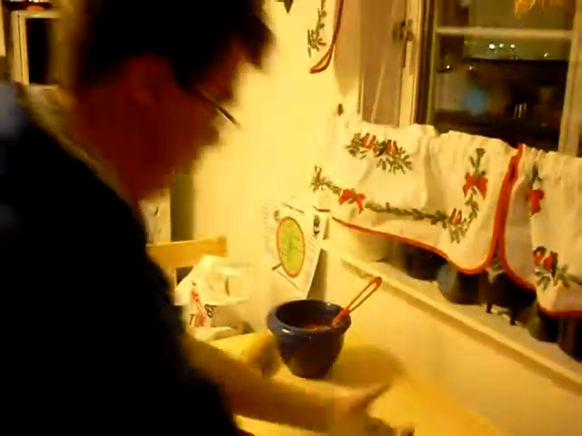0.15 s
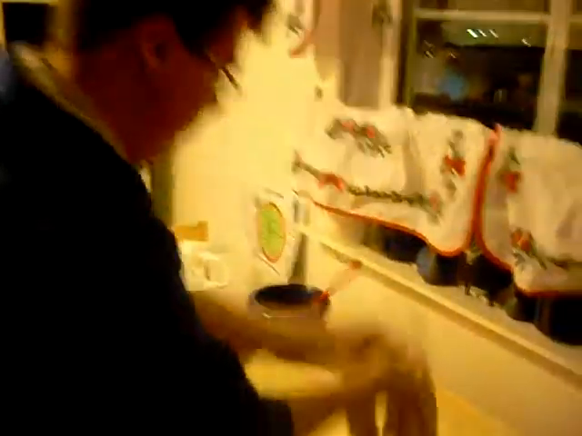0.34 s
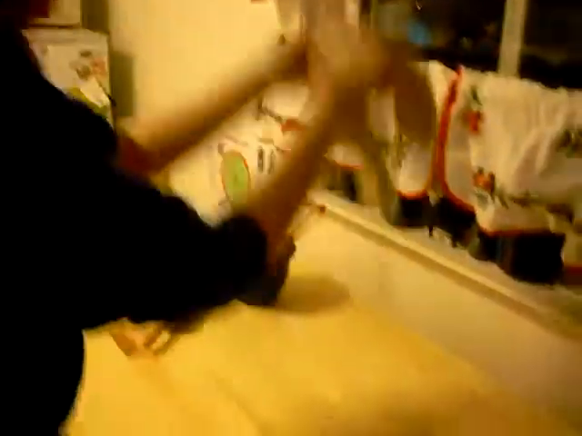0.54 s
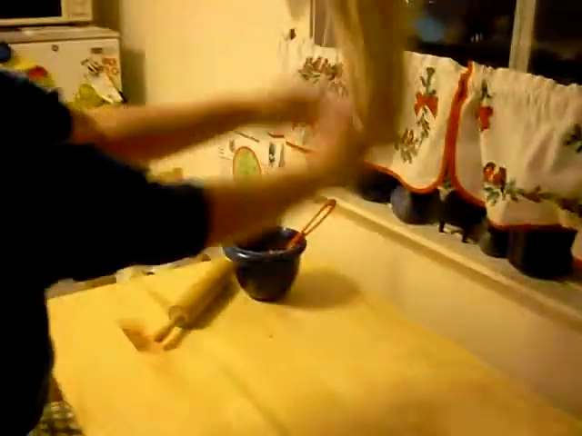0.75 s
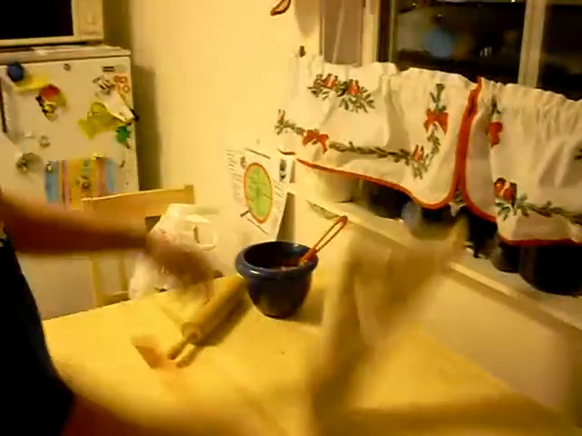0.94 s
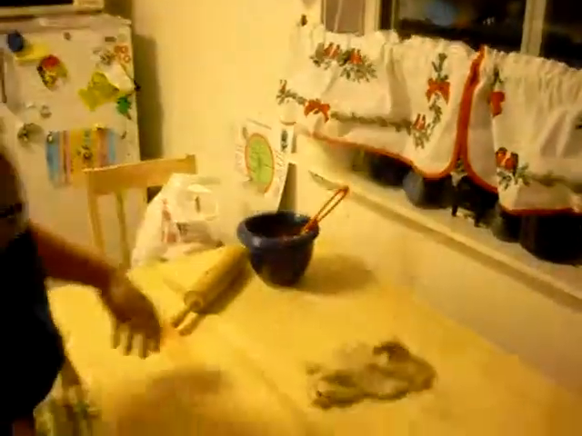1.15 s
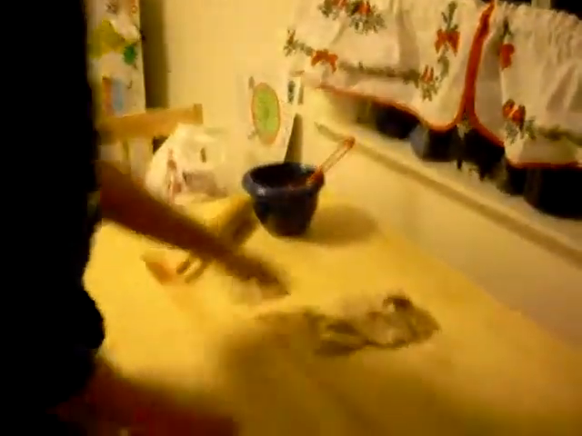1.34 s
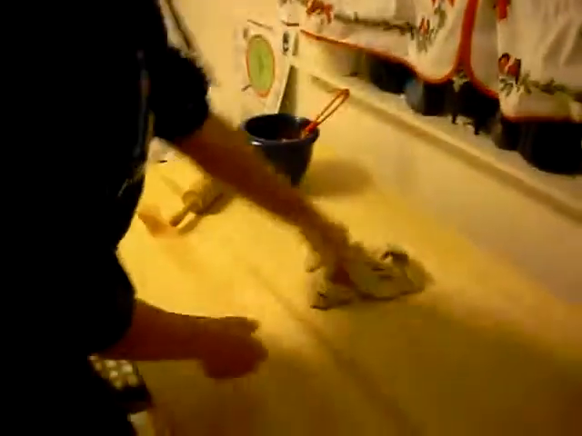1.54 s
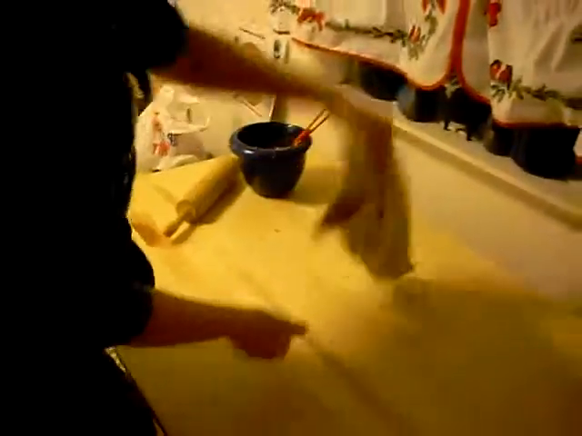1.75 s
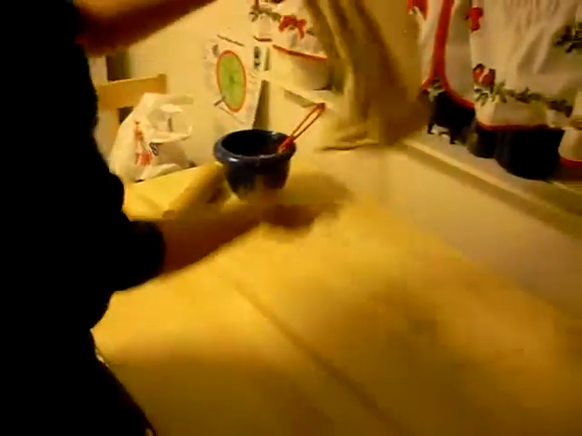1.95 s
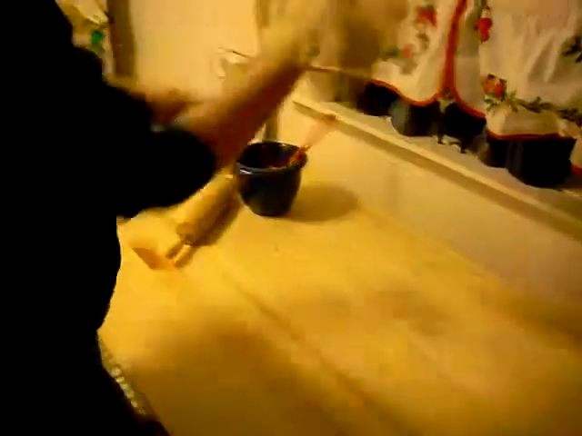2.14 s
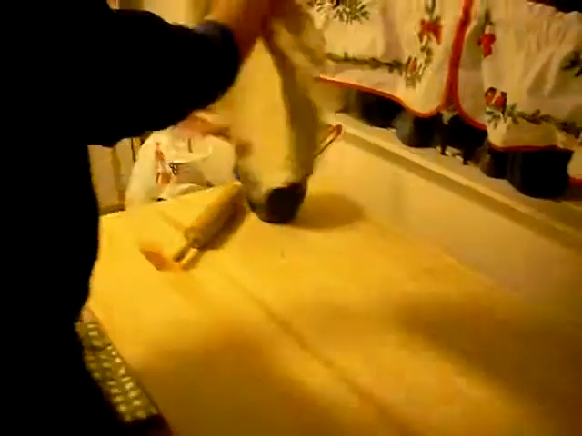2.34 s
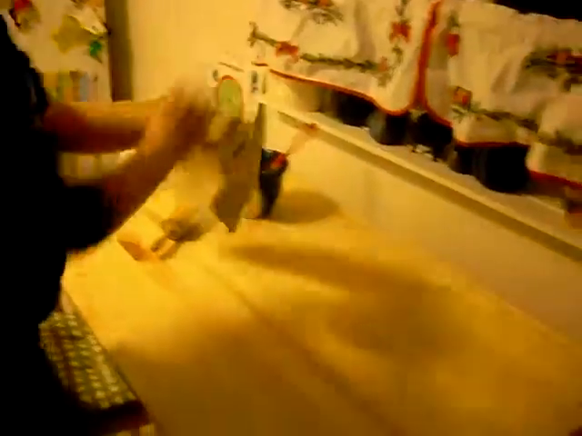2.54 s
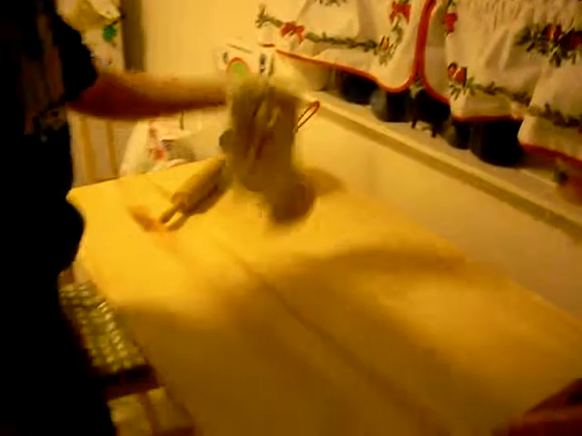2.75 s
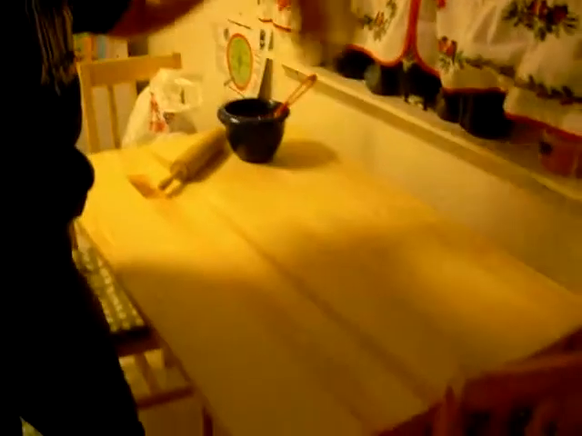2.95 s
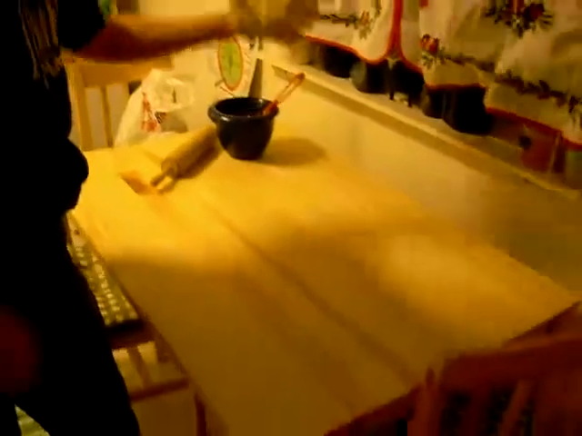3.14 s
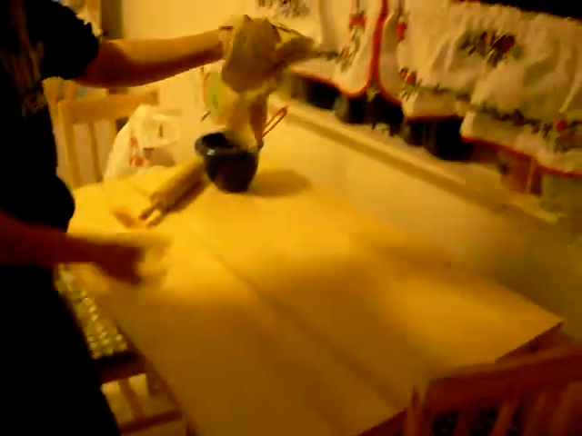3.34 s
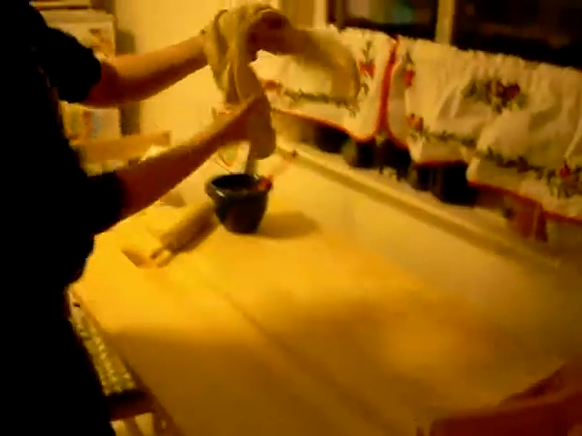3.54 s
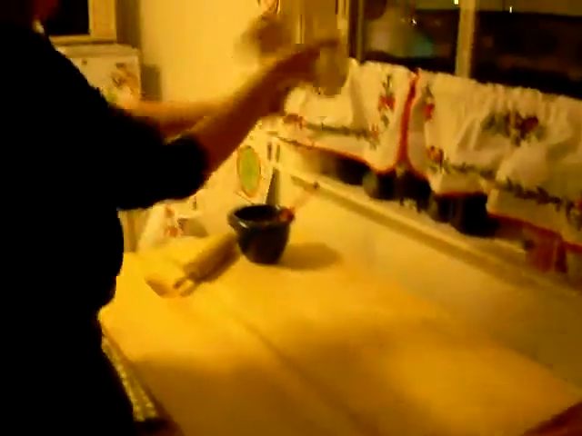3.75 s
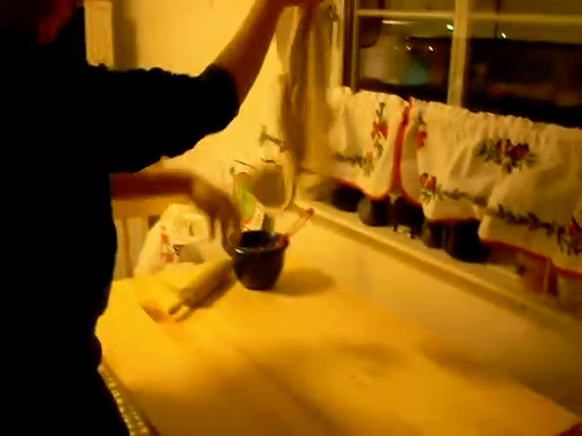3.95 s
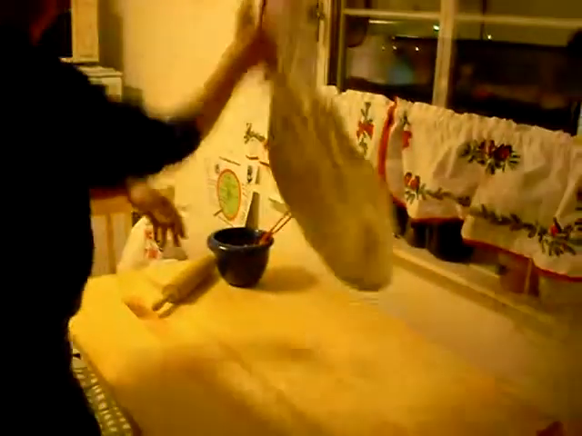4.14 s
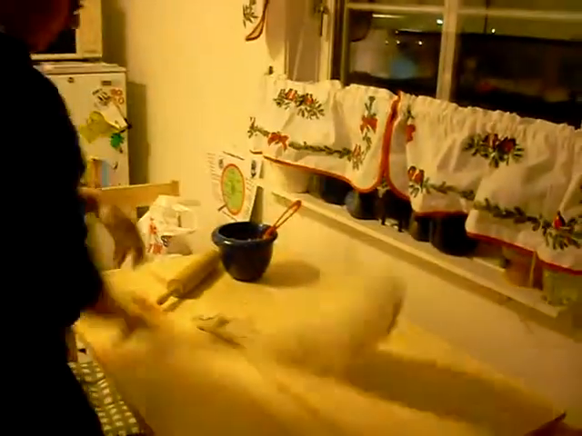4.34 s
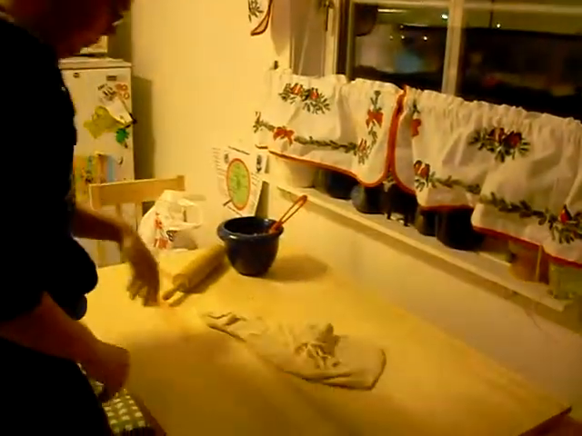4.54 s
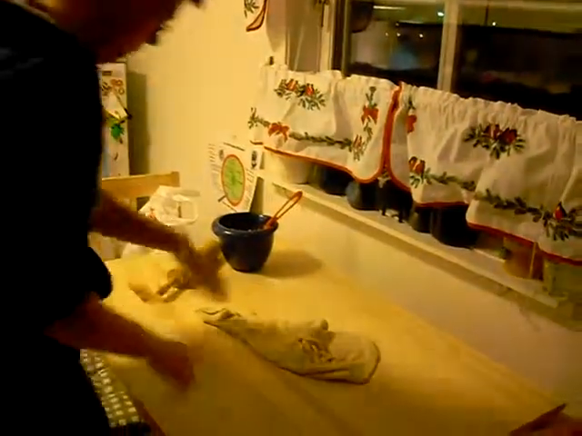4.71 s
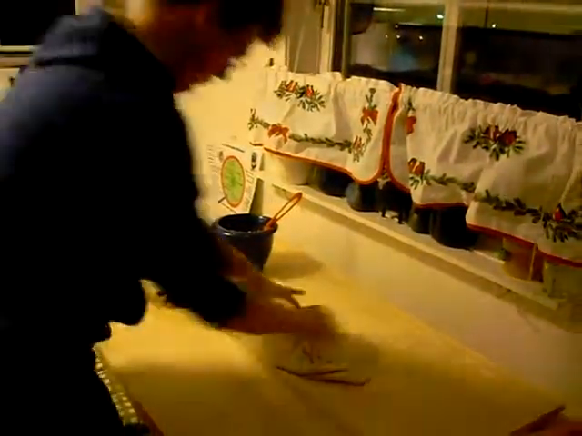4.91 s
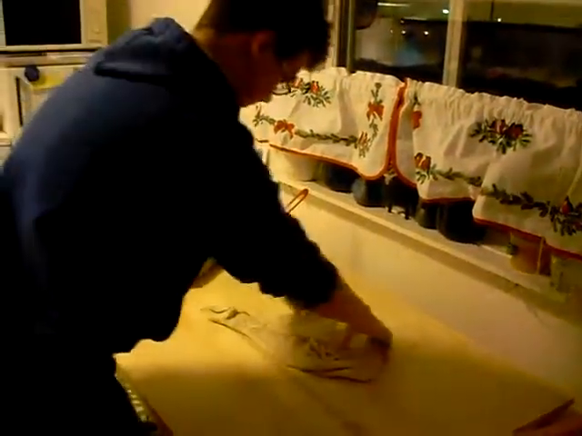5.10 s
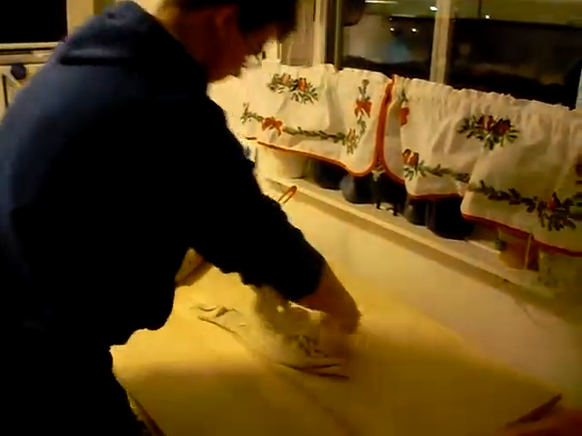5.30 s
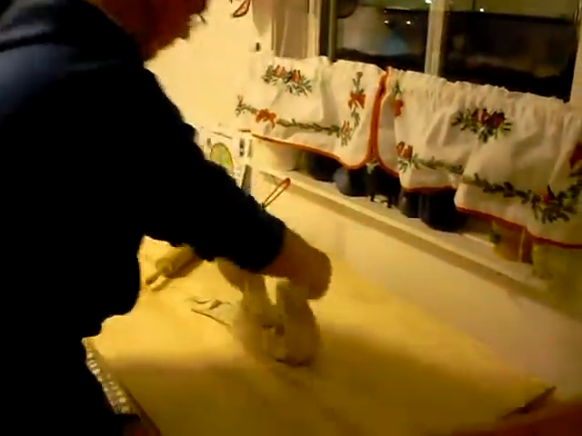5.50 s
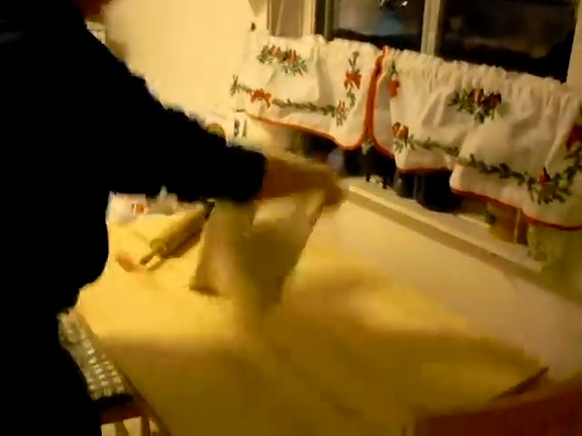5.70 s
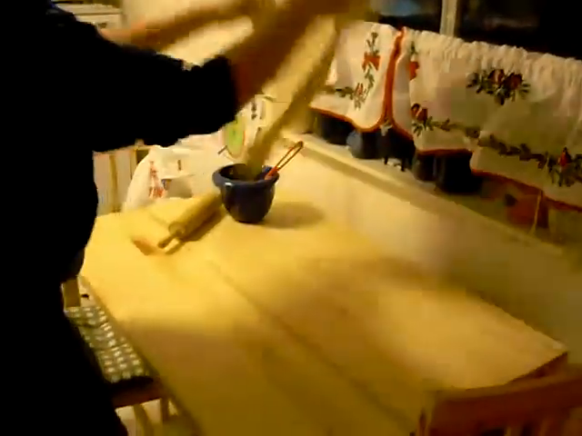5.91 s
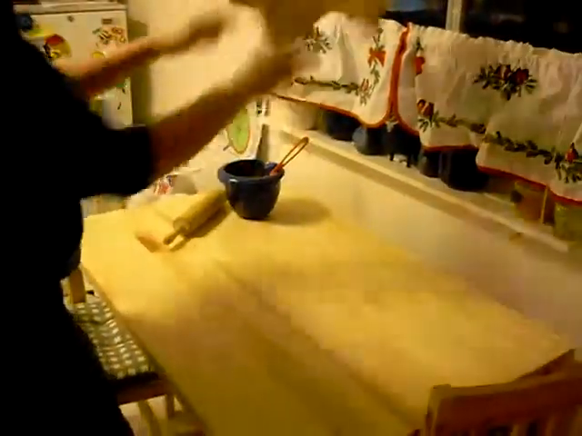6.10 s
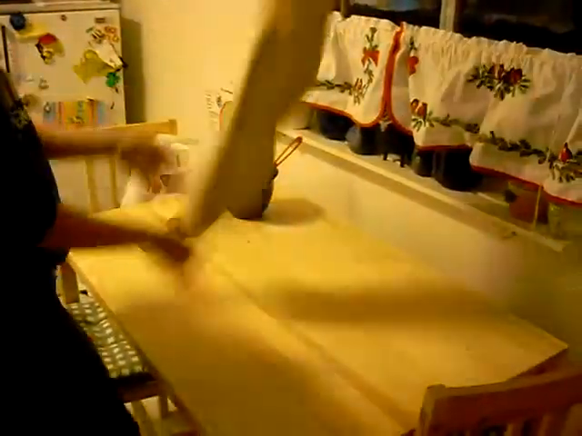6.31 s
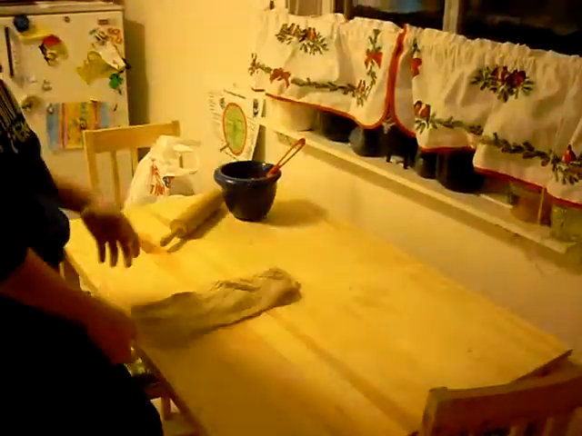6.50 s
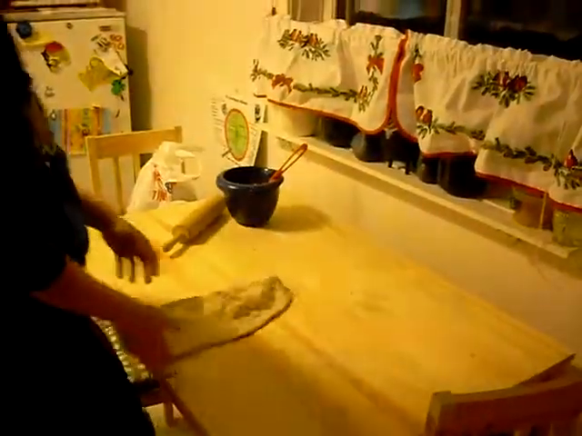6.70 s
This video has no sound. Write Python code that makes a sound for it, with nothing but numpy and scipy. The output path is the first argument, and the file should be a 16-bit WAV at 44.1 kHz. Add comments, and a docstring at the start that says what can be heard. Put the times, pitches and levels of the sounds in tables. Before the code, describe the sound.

Dough is thrown repeatedly onto a wooden tabletop, each blow a smack with a short woody thud and a brief kitchen echo. Light slaps and a solid one open, followed by a quieter stretch of sleeve rustle, soft pats and a dull swish. Then the loudest slap hits, a gentle pat follows, and a loose, flapping landing closes. The nearby microphone adds a low hiss and a faint intermittent buzz.

```python
"""A small kitchen: a sheet of dough is swung and slapped onto a wooden table, with softer pats between.
Each blow thuds in the boards and smacks as the dough spreads; trapped air pops out, the room rings briefly.
Sleeves rustle, floury fingers brush the dough, and the swinging sheet fans a dull swish.
The hardest slap overloads the microphone, whose electronics hiss and, in short bursts, faintly buzz."""
import sys
import numpy as np
from scipy import signal
from scipy.fft import rfft, irfft, next_fast_len
from scipy.io import wavfile
from scipy.ndimage import uniform_filter1d

SR = 44100
rng = np.random.default_rng(int(sys.argv[2]) if len(sys.argv) > 2 else 0)


def store_wav(level_fs):
    """Save 16-bit WAV to argv[1]."""
    pcm = np.round(np.clip(np.atleast_2d(level_fs), -1, 1) * 32767)
    wavfile.write(sys.argv[1], SR, pcm.T.astype(np.int16))


N = 298267
TIME = np.arange(N) / SR

# tone colours of the electronics, sliding cloth and dough skin: (frequency [Hz], relative level [dB])
HISS_COLOUR = [(15, -28.5), (25, 0), (82, -16.5), (170, -14.5), (363, -10), (451, -10), (560, -13),
               (1840, -19.5), (2160, -21), (3340, -24.5), (16000, -29)]
CLOTH_COLOUR = [(150, 2.5), (500, 0.5), (1000, 1.5), (2000, 0.5), (3500, 3), (6000, -1), (9500, -2),
                (12500, -8), (16000, -7.5)]
SMACK_COLOUR = [(30, -11.5), (110, -9.5), (230, -2.5), (450, -3), (900, -2), (1200, -7), (1600, -9),
                (2700, -6.5), (4200, -11), (5500, -13), (9000, -11), (16000, -19)]
# a sleeve slides as an arm reaches or lifts: (time of top speed [s], level [dB], length [s])
SLEEVE_SLIDES = [(0.625, -66, .06), (0.80, -61, 0.2), (1.54, -65, .1), (1.755, -60, 0.21), (2.08, -63, .1),
                 (2.215, -57, 0.13), (2.44, -56, 0.074), (2.59, -57.5, 0.24), (3.11, -66.5, 0.088),
                 (3.33, -62.5, 0.17), (3.73, -62.5, 0.13), (3.875, -60, .14), (4.305, -58, 0.056),
                 (5.15, -63.5, 0.1), (5.305, -62, 0.071), (5.77, -70.5, 0.099)]
# dough or hand lands with weight: (time [s], thud [dB], smack [dB], dull above [Hz], decay [s])
WEIGHTED_HITS = [(0.0372, -40, -30.5, 6000, 0.0085), (0.081, -46, -41.5, 3500, 0.018),
                 (0.2328, -47.5, -33.5, 1710, 0.003), (0.9834, -33, -20.5, 3540, 0.0073),
                 (1.017, -38.5, -32.5, 3500, 0.0046), (1.050, -37, -37, 3000, 0.007),
                 (1.469, -47, -61, 220, 0.016), (2.644, -48.5, -39, 1410, 0.0065),
                 (4.3635, -21, -6.5, 3120, .0105), (5.088, -67, -60, 500, 0.033),
                 (5.128, -48.5, -42.5, 560, .013), (6.4265, -45.5, -37, 2200, 0.015),
                 (6.458, -54, -41, 2000, 0.067), (6.569, -32.5, -31, 1310, 0.02)]
# a loose flap claps down with no weight behind it: (time [s], level [dB], dull above [Hz], length [s])
FLAP_CLAPS = [(0.1468, -26, 10900, 0.0063), (0.471, -51.5, 2500, 0.004), (1.059, -46.5, 13000, .022),
              (2.432, -52, 3000, .012), (4.113, -51.5, 1800, 0.004), (6.504, -35, 4840, 0.046),
              (6.549, -26, 7400, 0.035), (6.5667, -21, 12900, 0.0023)]
# the tabletop's modes: (frequency [Hz], level [dB], time to fall 60 dB [s])
TABLE_MODES = [(73, -4, .3), (148.2, -7.5, 0.35), (164, -14.5, .18), (218, -11, 0.35), (281.4, -7.5, 0.28),
               (371.3, -3, 0.45), (410, -8.5, 0.5), (481, -4.5, 0.26), (566, -5, 0.19), (700, -10.5, .22),
               (767, -9.5, .25), (830, -8.5, 0.52), (904, -16, 0.28), (984, -10, .28), (1353, -10.5, 0.26),
               (1540, -11.5, 0.1), (1596, -8.5, .22), (1795, -17, .22), (2010, -9.5, .2)]
# the kitchen's reverb: (frequency [Hz], level [dB], time to fall 60 dB [s])
REVERB_BANDS = [(60, -6, .45), (150, -8, 0.51), (326, 5.5, .45), (819, 3, .41), (1580, 2, .37),
                (3200, -5, 0.38), (7080, -2.5, .31), (15000, -8.5, 0.25)]
# air squeezed from under the dough: (time [s], level [dB], pitch [Hz], resonator width [Hz], decay [s])
AIR_POCKETS = [(0.1888, -36, 1600, 900, 0.003), (0.190, -33.5, 1012, 121, 0.0061),
               (0.984, -31, 2730, 1190, 0.0048), (1.469, -46.5, 217, 140, 0.027),
               (2.148, -53.5, 866, 300, 0.056), (2.181, -41, 1140, 640, 0.0046),
               (2.642, -37.5, 432, 217, 0.019), (2.713, -36, 960, 865, 0.012),
               (3.268, -48, 970, 1250, 0.023), (3.695, -60, 480, 182, 0.019),
               (4.364, -14.5, 1570, 552, 0.019), (4.364, -18.5, 164, 55, .02),
               (5.13, -46, 163, 80.2, 0.023), (6.427, -38.5, 1290, 297, 0.0072),
               (6.511, -33, 1620, 350, 0.013)]
# fingers brush over floury dough: (time [s], level [dB])
FINGER_BRUSHES = [(0.797, -54), (2.198, -54), (2.508, -56), (2.559, -54), (2.648, -52), (2.707, -57)]
# the sheet of dough swings through the air: (time of top speed [s], level [dB], length [s])
DOUGH_SWINGS = [(3.12, -67, 0.68), (3.98, -71.5, .3), (6.16, -71.5, 0.13)]


def from_db(db):
    """Decibels to gain."""
    return 10 ** (np.asarray(db) / 20)


def rms_one(x):
    """Scale to unit power."""
    return x / np.sqrt(np.mean(x ** 2) + 1e-20)


def at_hz(points, hz, column=1):
    """Read a column of a table along log frequency."""
    points = np.array(points)
    return np.interp(np.log(np.maximum(hz, 1)), np.log(points[:, 0]), points[:, column])


def low_pass(x, hz):
    """Roll off the highs at 12 dB an octave."""
    return signal.sosfilt(signal.butter(2, min(hz, .45 * SR), fs=SR, output="sos"), x + 1e-18)


def high_pass(x, hz):
    """Roll off the lows at 12 dB an octave."""
    return signal.sosfilt(signal.butter(2, hz, "high", fs=SR, output="sos"), x)


def noise(colour):
    """Steady noise of the given colour, at unit power."""
    size = next_fast_len(N)
    gain = from_db(at_hz(colour, np.fft.rfftfreq(size, 1 / SR)))
    return rms_one(irfft(rfft(rng.standard_normal(size)) * gain, size)[:N])


def flutter(hz, size=N):
    """A random modulator at unit power, moving mostly slower than hz."""
    return rms_one(low_pass(rng.standard_normal(size), hz))


def contact(rise_s, decay_s):
    """The envelope of a touch: straight attack, exponential tail."""
    t = TIME[:SR // 4]
    return np.minimum(t / rise_s, 1) * np.exp(-np.maximum(t - rise_s, 0) / decay_s)


def strokes(moves):
    """Each movement swells and fades in a bell, above half height for its length; their powers add."""
    bells = (from_db(db) * .5 ** np.minimum((2 * (TIME - s) / length) ** 2, 20)
             for s, db, length in moves)
    return np.sqrt(sum(bell ** 2 for bell in bells))


def burst(shape, texture):
    """A texture under an envelope, carrying the envelope's energy."""
    return rms_one(shape * texture) * np.sqrt(np.mean(shape ** 2))


def add(track, s, sound):
    """Mix a sound into a track at s seconds."""
    at = max(round(s * SR), 0)
    track[at:at + len(sound)] += sound[:max(N - at, 0)]


def mic_hiss(level_db=-65):
    """The microphone's electronics lay a steady bed of noise."""
    return from_db(level_db) * high_pass(noise(HISS_COLOUR), 22)


def rustle(drag_db=-54, drag_start_s=.035, drag_end_s=.39, fidget_db=-75, sway_db=3.5, grain_db=2):
    """Grainy friction: a palm drags dough over the floury board, sleeves slide, clothes keep stirring."""
    attack = np.clip((TIME - drag_start_s) / .029, 0, 1)
    release = np.exp(-np.maximum(TIME - drag_end_s, 0) / .039)
    drag = from_db(drag_db) * attack * release
    fidget = from_db(fidget_db + sway_db * flutter(hz=4))
    grain = from_db(grain_db * flutter(hz=97))
    envelope = np.sqrt(strokes(SLEEVE_SLIDES) ** 2 + drag ** 2 + fidget ** 2)
    return noise(CLOTH_COLOUR) * grain * envelope


def smack(skin, shape, thin_hz, dull_hz, snap_db=-21):
    """Dough skin hits: a small area gives little bass, and even a dull blow keeps a sticky snap."""
    stretch = np.roll(skin, rng.integers(N))[:len(shape)]
    texture = high_pass(stretch, thin_hz)
    snap = from_db(snap_db) * high_pass(texture, 2500)
    return burst(shape, low_pass(texture, dull_hz) - snap)


def landings(skin, thin_hz=65, rise_cycles=1.3, softness=.76):
    """Weight lands, the duller the slower its attack; gives the smacks and the force on the boards."""
    smacks, force = np.zeros((2, N))
    for s, thud_db, smack_db, dull_hz, decay in WEIGHTED_HITS:
        shape = contact(rise_cycles / dull_hz, decay)
        add(smacks, s, from_db(smack_db) * smack(skin, shape, thin_hz, dull_hz))
        # a soft contact pushes slowly and leaves the high modes quiet
        push = low_pass(signal.unit_impulse(len(shape)), softness * dull_hz)
        add(force, s, from_db(thud_db) * high_pass(push, thin_hz))
    return smacks, force


def table_thud(force):
    """Each push rings the boards' modes as dying sines of alternating polarity."""
    boards = np.zeros(N)
    for k, (hz, db, t60) in enumerate(TABLE_MODES):
        radius, angle = from_db(-60 / (t60 * SR)), 2 * np.pi * hz / SR
        feedback = [1, -2 * radius * np.cos(angle), radius ** 2]
        mode = signal.lfilter([0, np.sin(angle)], feedback, force + 1e-18)
        boards += (-1) ** k * from_db(db) * mode
    return boards


def kitchen_reverb(send, first_echo_s=.0035, build_s=.0039):
    """Dense echoes from near walls build up quickly and die sooner in the treble."""
    t = TIME[:SR]
    build = np.clip((t - first_echo_s) / build_s, 0, 1)
    edges_hz = np.geomspace(40, 18000, 14)
    white, response = rng.standard_normal((2, SR)), 0
    for k, (low, high) in enumerate(zip(edges_hz, edges_hz[1:])):
        hz = np.sqrt(low * high)
        band = signal.sosfilt(signal.butter(2, [low, high], "band", fs=SR, output="sos"), white[k % 2])
        tail = from_db(-60 * t / at_hz(REVERB_BANDS, hz, column=2))
        gain = from_db(at_hz(REVERB_BANDS, hz)) * np.sqrt(2 * (high - low)) / SR
        response += gain * rms_one(band * build * tail)
    return signal.fftconvolve(send, response)[:N]


def standing_wave(boards, hz=285, width_hz=7, gain_db=7):
    """One table mode is in tune with the room, so its hum blooms and lingers after each blow."""
    return from_db(gain_db) * signal.lfilter(*signal.iirpeak(hz, hz / width_hz, fs=SR), boards)


def flaps(skin, rise_share=.45, thin_hz=379.4):
    """Loose flaps of dough clap down thinly, too light to ring the boards."""
    out = np.zeros(N)
    for s, db, dull_hz, length in FLAP_CLAPS:
        rise = rise_share * length
        add(out, s, from_db(db) * smack(skin, contact(rise, length - rise), thin_hz, dull_hz))
    return out


def air_pops(rise_share=.18, jet_db=-19, jet_hz=7000):
    """Escaping air sounds the steep resonance of its pocket, with a thin hiss from the jet itself."""
    out = np.zeros(N)
    for s, db, hz, width, decay in AIR_POCKETS:
        shape = contact(rise_share * decay, decay)
        air = rng.standard_normal(SR // 2)
        b, a = signal.iirpeak(hz, hz / width, fs=SR)
        pocket = rms_one(signal.lfilter(b, a, signal.lfilter(b, a, air)))  # two passes narrow the peak
        jet = from_db(jet_db) * rms_one(low_pass(air, jet_hz))
        add(out, s, from_db(db) * burst(shape, (pocket + jet)[-len(shape):]))
    return out


def mic_buzz(level_db=-64, first_s=.195, every_s=.3715, lasts_s=.125, pulse_hz=91):
    """The electronics give regular bursts of soft, uneven pulses: a faint low buzz."""
    jitter, uneven_db, edge_db = .2, 4.5, -24
    pace_hz = pulse_hz * (1 + jitter * flutter(hz=40))
    ticks = np.diff(np.floor(np.cumsum(pace_hz) / SR), prepend=0)
    heights = from_db(uneven_db * rng.standard_normal(N))
    gate = (TIME - first_s) % every_s < lasts_s
    pulses = ticks * heights * uniform_filter1d(gate * 1., size=900)
    rounded = low_pass(pulses, 115) + from_db(edge_db) * low_pass(pulses, 450)
    buzz = rms_one(high_pass(rounded, 38)) * np.sqrt(lasts_s / every_s)  # unit power within a burst
    return -from_db(level_db) * buzz


def flour_brushes(rise_s=.01, decay_s=.0088, thin_hz=7500, grain_db=4):
    """Flour grains catching on the skin give short, very bright, gritty hisses."""
    out = np.zeros(N)
    shape = contact(rise_s, decay_s)
    for s, db in FINGER_BRUSHES:
        sizzle = high_pass(rng.standard_normal(len(shape)), thin_hz)
        clumps = from_db(grain_db * flutter(hz=400, size=len(shape)))
        add(out, s, from_db(db) * burst(shape, sizzle * clumps))
    return out


def swishes(low_hz=346, high_hz=1175):
    """The swinging sheet stirs a soft, dull rush of air."""
    air = high_pass(low_pass(rng.standard_normal(N), high_hz), low_hz)
    return rms_one(air) * strokes(DOUGH_SWINGS)


def scene(grain_db=3.5, smack_send_db=-1.77, flap_send_db=-8.5, thud_send_db=-20, pop_send_db=-11):
    """The mono mix: hits and pops feed the kitchen's reverb; movement and microphone noise stay dry."""
    skin = noise(SMACK_COLOUR) * from_db(grain_db * flutter(hz=330))  # dough's many tiny contacts
    smacks, force = landings(skin)
    boards = table_thud(force)
    claps = flaps(skin)
    pops = air_pops()
    send = from_db(smack_send_db) * smacks + from_db(flap_send_db) * claps
    send += from_db(thud_send_db) * boards + from_db(pop_send_db) * pops
    room = kitchen_reverb(send) + standing_wave(boards)
    movement = rustle() + swishes() + flour_brushes()
    electronics = mic_buzz() + mic_hiss()
    return (smacks + boards + claps + pops + room + movement + electronics)[None]


def record(dry, ceiling=.49, cutoff_hz=15850):
    """The input stage soft-clips the loudest peaks; a steep low-pass takes off the very top."""
    clipped = dry / (1 + (dry / ceiling) ** 4) ** (1 / 4)
    return signal.sosfiltfilt(signal.ellip(10, .05, 60, cutoff_hz, fs=SR, output="sos"), clipped)


dry = scene()
out = record(dry)
store_wav(out)
```